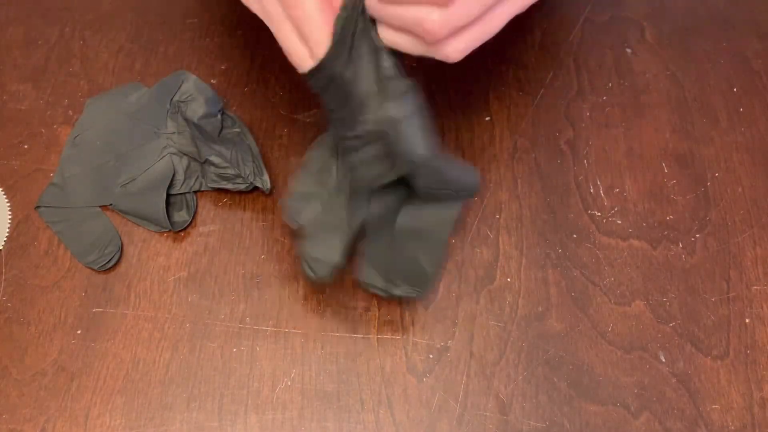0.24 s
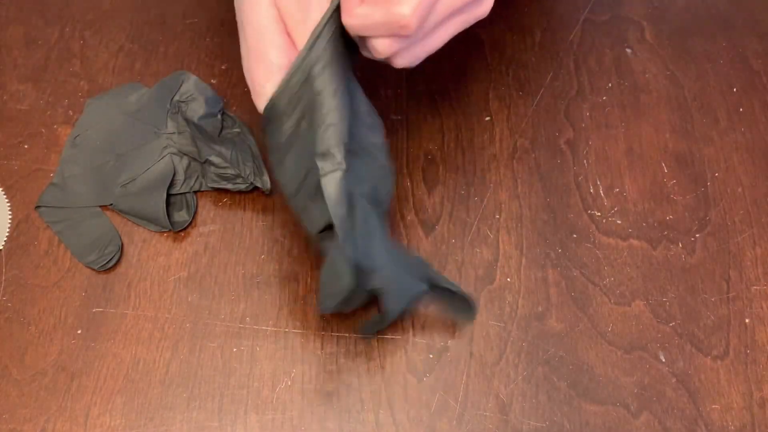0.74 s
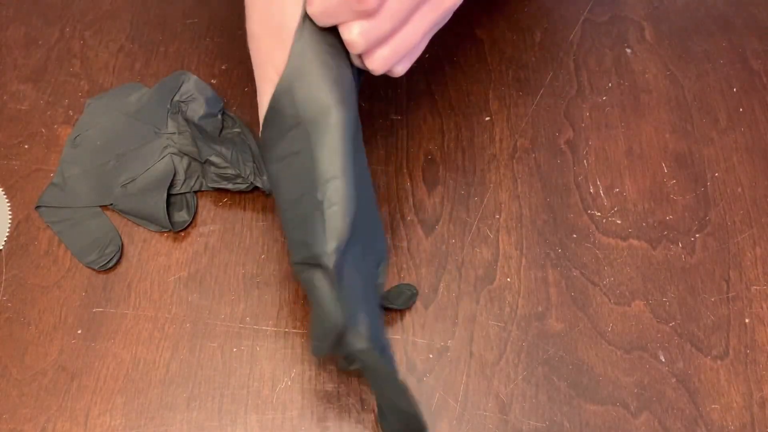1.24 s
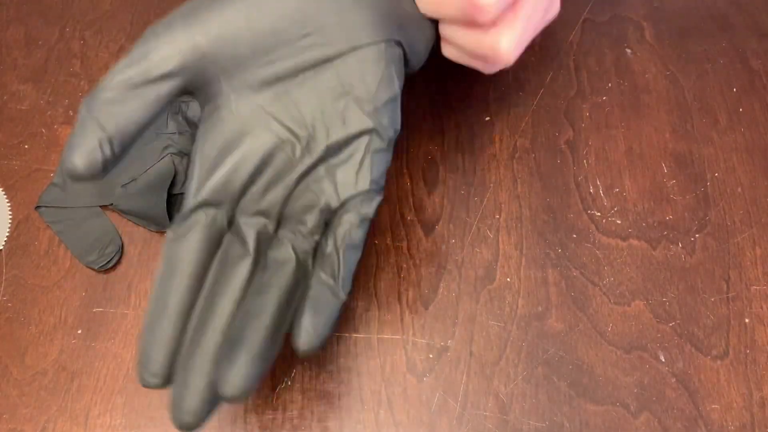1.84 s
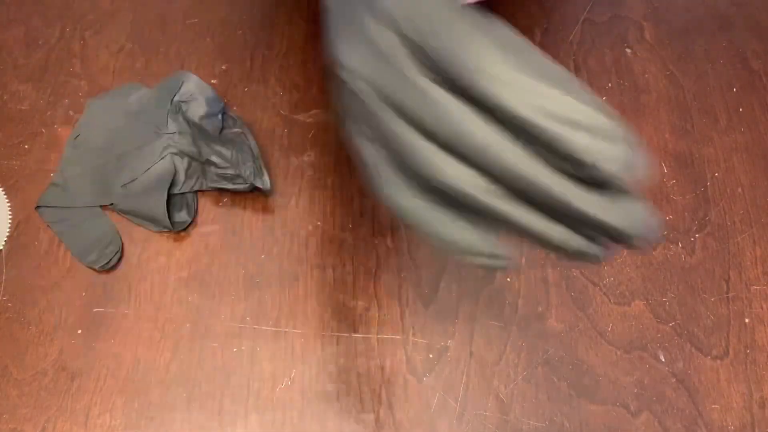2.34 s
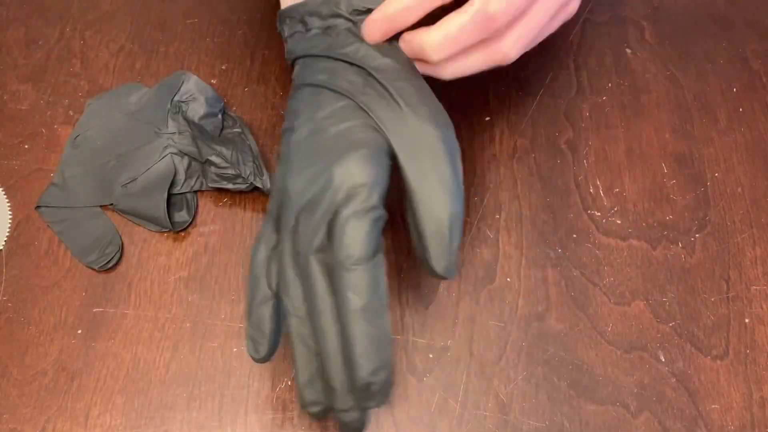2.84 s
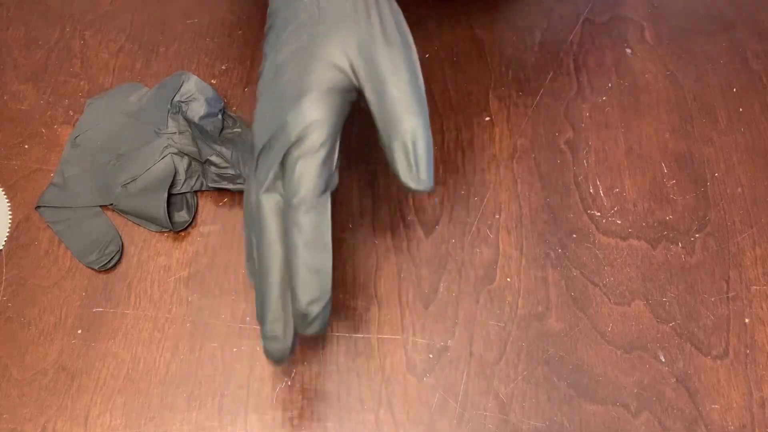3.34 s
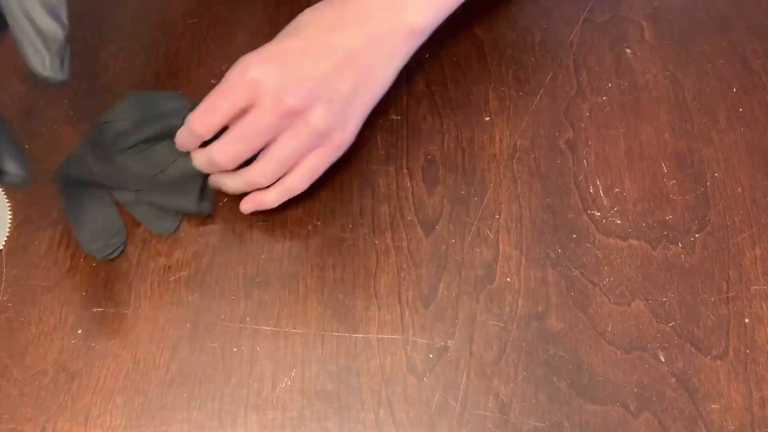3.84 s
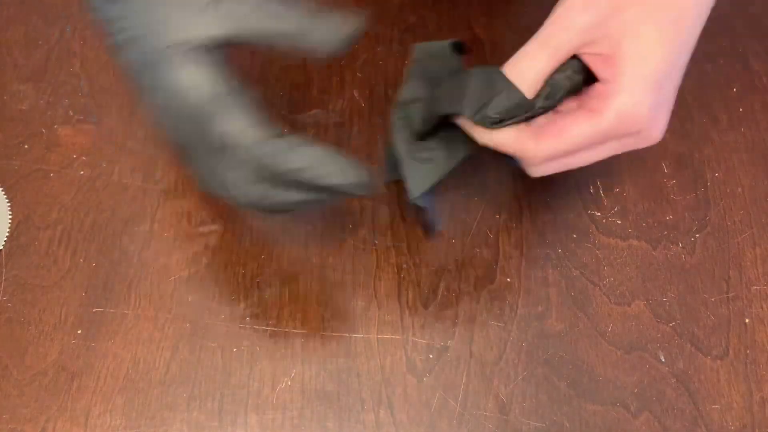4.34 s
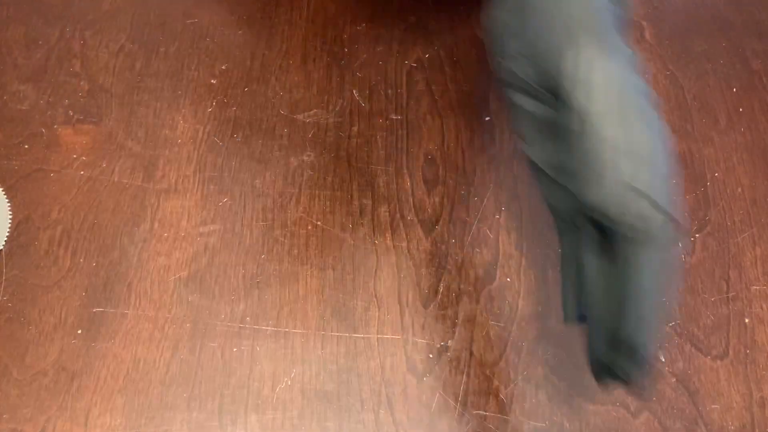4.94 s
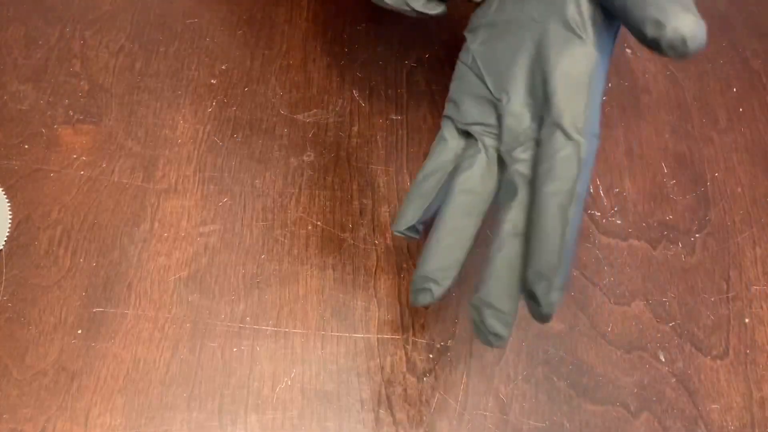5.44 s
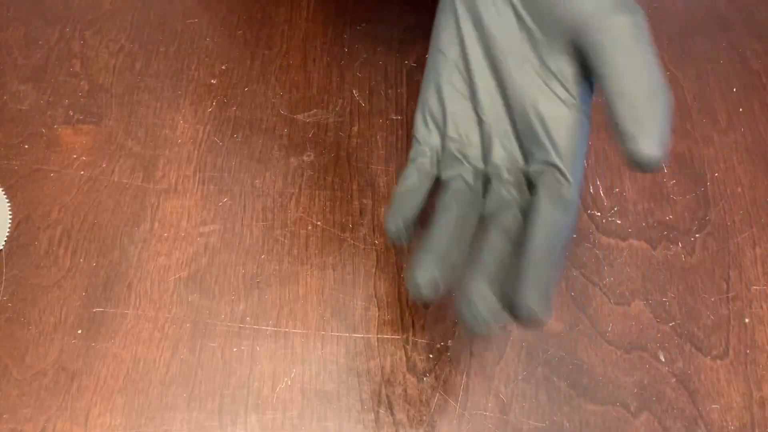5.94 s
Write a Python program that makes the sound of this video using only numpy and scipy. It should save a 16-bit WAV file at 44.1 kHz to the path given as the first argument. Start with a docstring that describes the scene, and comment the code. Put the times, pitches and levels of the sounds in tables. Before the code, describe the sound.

Two thin rubber gloves are pulled on close up, with crackly rustling, squeaky stretching, sharp finger pops and one loud cuff snap in a quiet room.

```python
"""A small quiet room: two thin rubber gloves are pulled on over a wooden table, close to a stereo microphone.
Each pull, and a hand sliding on the table near 3.8 s, is filtered slip noise that hisses and crackles.
Wrinkles and creases tick, dragging rubber rasps; finger pops, cuff snaps and judders are noise cracks, ringing
slaps and trapped air. Short low pushes are decaying sines; quick bounces, a short ringing tail and a low steady
rumble of shaped noise make the room. For about 60 ms near 4.3 s the sound drops out completely."""
import sys
import numpy as np
from scipy import signal
from scipy.fft import rfft, irfft
from scipy.io import wavfile
from scipy.ndimage import uniform_filter1d

SR = 44100
rng = np.random.default_rng(int(sys.argv[2]) if len(sys.argv) > 2 else 0)


def unload_wav(signal):
    """Save mono or channel-first audio to the path in sys.argv[1] as 16-bit WAV at rate SR, clipped to [-1, 1]."""
    wavfile.write(
        sys.argv[1],
        SR,
        np.round(np.clip(np.atleast_2d(signal).T, -1, 1) * 32767).astype(np.int16),
    )


N = 272097  # length in samples

# Bright spectrum of rubber cracking, shared by snaps and creases.
# Each row: frequency in Hz, relative level in dB.
CRACK_SPECTRUM = [(200, -25), (1500, -13), (2800, -7), (4500, -5.5), (6500, -3.5), (8300, -1.5), (9800, .5),
                  (12000, 0), (16000, -2.5)]


def rubbing():
    """Sliding hisses; the folds of the rubber flutter and give a coarser, lower crackle, with wrinkle ticks."""
    # Spectrum of the hiss. Each row: frequency in Hz, relative level in dB.
    hiss_spectrum = [(300, -40), (1500, -18), (2900, -10.5), (4000, -7.5), (5400, -7.5), (7000, -4),
                     (8400, -3), (10000, 0), (12800, -1.2), (15200, 0), (16000, -2)]
    # Spectrum of the flexing sheet. Each row: frequency in Hz, relative level in dB.
    body_spectrum = [(40, -18.5), (140, -1), (260, 0), (480, 2), (800, -6.5), (1300, -6.5), (1700, -13),
                     (2050, -6), (2600, -5.5), (3700, -1.5), (5000, -3), (12000, -22.5)]
    # How loose and wrinkled the sheet is, most of all while the first glove hangs empty.
    # Each row: time in seconds, relative level of the wrinkles in dB.
    looseness_points = [(0, 6), (0.85, 7), (1.4, 2), (2.0, -10), (3.0, -21), (4.4, 1), (4.7, -1),
                        (6.17, -6.5)]

    hiss_level, body_level = effort()
    catch = wander(rate_hz=150)  # the rubber grips and lets go

    hiss_grains = slips(per_s=4600, spread_db=3.5, smooth=0.44)
    hiss = spread(colour(hiss_grains, hiss_spectrum), width=0.0024)
    hiss = hiss * hiss_level * amp(0.94 * catch)

    body_grains = slips(per_s=1200, spread_db=1.0, smooth=0.59)
    body = spread(colour(body_grains, body_spectrum), width=0.54)
    body = body * body_level * amp(2.48 * catch + 3.0)

    # wrinkles stand out where the sheet flexes but hardly slides
    flex_share = np.sqrt(body_level / (body_level + hiss_level))
    looseness = amp(np.interp(np.arange(N) / SR, *np.transpose(looseness_points)))
    ticks = stereo_image(wrinkles(per_s=210, spread_db=9.0, ring_s=0.0005))
    ticks = ticks * body_level * flex_share * looseness * amp(-3.5)
    return folds(hiss, patchy_db=2.5) + folds(body, patchy_db=4.0) + ticks


def effort():
    """Levels of hiss and body: each pull swells to its fastest sliding and fades; overlaps add in power."""
    # Pulls of rubber over skin, and a hand sliding on the table near 3.8 s.
    # Each row: time of fastest sliding in seconds, swell in seconds, fade in seconds,
    # relative hiss level in dB, relative level of the lower body in dB.
    pulls = [(0.03, 0.15, 0.15, -53, -67.5), (0.135, 0.048, 0.018, -47.5, -62.5),
             (0.25, 0.1, 0.11, -48, -63.5), (0.485, 0.072, 0.024, -54.5, -61),
             (0.579, 0.014, 0.014, -53, -53), (0.63, 0.062, 0.058, -50, -60),
             (0.78, 0.003, 0.016, -49, -81), (0.828, 0.051, 0.1, -45.5, -60),
             (1.045, 0.082, 0.053, -53.5, -60), (1.17, 0.016, 0.18, -46.5, -60),
             (1.246, 0.064, 0.062, -38.5, -50.5), (1.44, 0.037, 0.1, -61.5, -60),
             (1.595, 0.08, 0.13, -51.5, -59.5), (1.785, 0.0079, 0.01, -43, -48),
             (1.883, 0.063, 0.051, -53.5, -58.5), (2.04, 0.04, 0.13, -59, -66.5),
             (2.194, 0.061, 0.021, -49.5, -60), (2.355, 0.06, 0.1, -63.5, -75),
             (2.478, 0.018, 0.013, -62, -68), (2.54, 0.013, 0.033, -66, -64.5),
             (2.606, 0.032, 0.039, -50, -79), (2.804, 0.014, 0.027, -66, -81),
             (2.899, 0.024, 0.013, -64, -75), (3.023, 0.03, 0.016, -45.5, -81),
             (3.115, 0.083, 0.019, -62.5, -71), (3.39, 0.042, 0.027, -56, -64.5),
             (3.76, 0.059, 0.1, -58.5, -67.5), (3.862, 0.043, 0.021, -61.5, -68.5),
             (4.035, 0.021, 0.04, -48, -63), (4.211, 0.035, 0.042, -56, -70), (4.5, 0.039, 0.069, -55, -58),
             (4.634, 0.0069, 0.0088, -57, -58.5), (4.672, 0.0071, 0.03, -55.5, -60.5),
             (4.73, 0.036, 0.078, -39, -54), (4.899, 0.065, 0.056, -48.5, -55),
             (5.03, 0.017, 0.026, -52.5, -64), (5.186, 0.0063, 0.018, -58, -65.5),
             (5.275, 0.016, 0.049, -58.5, -70), (5.41, 0.018, 0.1, -58.5, -65.5),
             (5.462, 0.0025, 0.075, -37, -52.5), (5.516, 0.0087, 0.0086, -42, -45),
             (5.695, 0.013, 0.071, -55.5, -63.5), (5.87, 0.022, 0.089, -58.5, -62.5),
             (5.931, 0.013, 0.02, -43, -55), (5.984, 0.012, 0.021, -61, -64.5),
             (6.074, 0.021, 0.053, -48.5, -50)]
    pull_shape = 1.75  # exponent of swell and fade: 1 is a sharp peak, 2 a round bell
    body_follow = 0.75  # the sheet keeps flexing a little before and after it slides
    rest_hiss_db, rest_body_db = -78.5, -81.5  # the hands are never quite still

    t = np.arange(N) / SR
    hiss_power = np.full(N, amp(rest_hiss_db) ** 2)
    body_power = np.full(N, amp(rest_body_db) ** 2)
    for s, swell, fade, hiss_db, body_db in pulls:
        near = (t > s - 5 * swell) & (t < s + 5 * fade)
        distance = np.maximum((s - t[near]) / swell, (t[near] - s) / fade)
        speed = np.exp(-distance ** pull_shape)
        hiss_power[near] += (amp(hiss_db) * speed) ** 2
        body_power[near] += (amp(body_db) * speed ** body_follow) ** 2
    return np.sqrt(hiss_power), np.sqrt(body_power)


def slips(per_s, spread_db, smooth):
    """Tiny stick-slip releases of uneven size over the smooth noise of sliding."""
    sizes = amp(spread_db * np.minimum(rng.exponential(1, (3, N)), 4))
    happens = rng.random((3, N)) < per_s / SR
    clicks = sizes * rng.choice([-1, 1], (3, N)) * happens
    return unit(unit(clicks) + smooth * rng.standard_normal((3, N)))


def wrinkles(per_s, spread_db, ring_s):
    """Single wrinkles flip over with a dry tick, each at one of six pitches."""
    t, out = np.arange(256) / SR, np.zeros(N)
    pitches_hz = [1300, 1550, 1750, 1900, 2000, 2100]
    for hz in pitches_hz:
        happens = rng.random(N) < per_s / len(pitches_hz) / SR
        flips = happens * amp(spread_db * rng.uniform(-0.26, 1, N))
        tick = np.sin(2 * np.pi * hz * t) * t * np.exp(-t / ring_s)
        out += signal.oaconvolve(flips, tick)[:N]
    return unit(out)


def folds(x, patchy_db):
    """Folds open and close and recolour the rustle in patches; closing muffles more than opening adds."""
    z = signal.stft(x, SR, nperseg=512)[2]
    patches = rng.standard_normal(z.shape[1:])
    patches = uniform_filter1d(patches, size=6, axis=0)  # across frequency
    patches = unit(uniform_filter1d(patches, size=5, axis=1))  # across time
    patches = np.minimum(patches, .8)
    return signal.istft(z * unit(amp(patchy_db * patches)), SR, nperseg=512)[1][:, :N]


def chafing():
    """Where rubber drags on rubber, quick slips ring the sheet or the air under it in a grainy rasp."""
    # Rubber chafing on rubber, high where it is taut and hollow over a pocket of air.
    # Each row: time of the middle in seconds, level in dB, pitch in Hz, length to 1/e either side in seconds.
    chafes = [(0.812, -56, 487, 0.046), (0.867, -61.5, 1640, 0.16), (1.235, -48.5, 1860, 0.03),
              (1.598, -59, 3760, 0.0088), (1.66, -58, 555, 0.045), (1.827, -69, 493, 0.039),
              (2.124, -65.5, 1190, 0.063), (2.58, -65, 413, 0.05), (2.62, -56, 10400, 0.019),
              (3.024, -61, 1050, 0.013), (3.957, -66.5, 3800, 0.0092), (4.556, -62.5, 514, 0.045),
              (4.735, -53, 2580, 0.046), (4.961, -54.5, 3630, 0.014), (6.095, -41.5, 3350, 0.024)]
    t, out = np.arange(-8192, 8192) / SR, np.zeros((3, N))
    grains = slips(per_s=1100, spread_db=1.5, smooth=1.0)
    for s, db, hz, length in chafes:
        drive = np.roll(grains, -round(s * SR), axis=1)[:, :len(t)]
        swell = np.exp(-(t / length) ** 2)
        for channel in range(3):
            rasp = band_pass(drive[channel], hz, ratio=1.25)
            add(out[channel], s + t[0], amp(db) * rasp * swell)
    return spread(out, width=0.99)


def creases():
    """A crease buckles all at once: a bright edge and a tick that is gone within a few cycles."""
    # Creases that flip over with a dry click.
    # Each row: start in seconds, tick level in dB, tick pitch in Hz, level of the bright edge in dB.
    flips = [(0.549, -45, 1400, -53), (0.559, -48, 1500, -53), (1.111, -42, 2020, -60),
             (1.3855, -42, 2060, -64), (1.442, -44, 1950, -35.5), (1.63, -49, 1400, -60),
             (1.659, -48, 1300, -58), (1.859, -50, 1100, -63), (1.867, -47, 1100, -42),
             (1.8796, -37.5, 1050, -36), (1.892, -37, 2400, -55), (1.908, -46, 1900, -39),
             (1.9245, -41.5, 1670, -46), (2.515, -51, 2340, -64), (2.526, -40, 3100, -67),
             (2.534, -56, 1280, -53), (2.542, -57, 1090, -61), (3.952, -49, 4000, -67),
             (4.426, -43.5, 2500, -54), (4.4284, -47, 1970, -51), (4.4743, -42.5, 1900, -47.5),
             (4.5005, -46, 1900, -45), (4.504, -44, 2300, -52), (4.533, -49, 1300, -49),
             (4.561, -42, 1380, -46), (4.5935, -47, 1900, -52), (4.599, -48, 1740, -46.5),
             (5.1814, -44, 2900, -48), (5.191, -55, 3000, -57), (5.305, -62.5, 3050, -42),
             (6.093, -28, 3370, -33), (6.1118, -38, 3400, -27.5)]
    t = np.arange(512) / SR
    edges, ticks = np.zeros(N), np.zeros(N)
    for s, tick_db, hz, edge_db in flips:
        add(edges, s, amp(edge_db) * rng.standard_normal(len(t)) * np.exp(-t / 0.0007))
        add(ticks, s, amp(tick_db) * np.sin(2 * np.pi * hz * t) * np.exp(-t / 0.001))
    return stereo_image(colour(edges, CRACK_SPECTRUM) + ticks)


def snaps():
    """The sheet whips down with a crack and a slap, and the air trapped under it rings."""
    # Finger pops and cuff snaps. Each row: contact in seconds, relative crack level in dB, slap level in dB,
    # slap pitch in Hz, relative air pocket level in dB, slap decay in seconds, and the share of the slap
    # that is one clean blow from 0 to 1 (the rest is the sheet fluttering).
    pops = [(0.5655, -55, -48, 960, -41, 0.0024, 0), (0.5728, -41.5, -35.5, 2430, -47, 0.0014, 0.3),
            (0.5738, -51, -36.5, 1150, -37.5, 0.0008, 0.5), (0.5873, -56, -44, 1240, -50, 0.00064, 0.7),
            (0.6026, -58, -42, 1190, -61, 0.0015, 0.9), (0.6169, -55, -39, 1300, -54, 0.0012, 0.7),
            (0.6269, -48, -36, 1280, -42.5, 0.0024, 0.3), (0.6405, -52, -45, 1200, -50, 0.0013, 0.9),
            (1.6378, -70, -49, 790, -36.5, 0.0021, 0.8), (1.648, -72, -54, 1100, -41.5, 0.0014, 0.4),
            (1.6895, -66, -51, 810, -41, 0.0013, 0.7), (1.7443, -50, -45, 1400, -52, 0.0013, 0.4),
            (1.7487, -48, -39, 1120, -37.5, 0.0016, 0.7), (1.753, -39, -37.5, 990, -39.5, .0011, 0.9),
            (1.7811, -36.5, -38.5, 1300, -26, 0.0012, .6), (3.0322, -53, -56.5, 980, -54, 0.0073, 0.06),
            (3.3442, -35, -38.5, 950, -38.5, 0.002, 0.83), (4.8335, -30, -28.5, 1860, -38, 0.0073, 0),
            (4.8368, -15.5, -22, 1500, -25, 0.0015, 0.3), (4.851, -44.5, -37, 1880, -34.5, 0.0027, 0.07),
            (5.5215, -38, -28.5, 1230, -31.5, 0.0031, 0.4), (5.694, -36, -34.5, 1890, -56, 0.0079, 0),
            (5.9338, -36.5, -49, 1143, -48.5, 0.002, 0.03), (6.0632, -37, -43, 910, -39, 0.0064, 0.2),
            (6.078, -34, -40, 980, -42, 0.0024, 0.04), (6.0835, -33, -41, 1400, -38, 0.0011, 0.7),
            (6.1095, -42, -44, 1010, -39, 0.0028, .3)]
    t = np.arange(-512, 1536) / SR
    cracks, bodies = np.zeros((3, N)), np.zeros(N)
    for s, crack_db, slap_db, slap_hz, pocket_db, decay, blow_share in list(pops) + judders():
        crack = rng.standard_normal((3, len(t))) * burst(t, rise_s=.0008, fall_s=.0028)
        crack[0] += 5.6 * (t == 0)  # the instant of contact
        for channel in range(3):
            add(cracks[channel], s + t[0], amp(crack_db + 2.5) * crack[channel])
        blow = amp(slap_db) * slap(t, slap_hz, decay, blow_share)
        air = amp(pocket_db + 1.0) * pocket(t)
        add(bodies, s + t[0], blow + air)
    left_right = amp([[1.1], [-1.1]])  # the left is a little louder
    return spread(colour(cracks, CRACK_SPECTRUM), width=0.36) + stereo_image(bodies) * left_right


def judders():
    """Taut rubber jumps along the skin in a run of small snaps, nearly even in time, uneven in strength."""
    # Each row: first snap in seconds, count of snaps, spacing in seconds, relative crack level in dB,
    # slap level in dB, slap pitch in Hz, relative air pocket level in dB, growth in dB per snap.
    runs = [(4.551, 5, 0.01, -66.5, -54, 1205, -57, 0), (4.705, 2, 0.0095, -57, -45, 1077, -54, -2.5),
            (5.462, 2, 0.018, -37.5, -38, 1140, -47, 0), (5.5027, 7, .0029, -50, -41, 1140, -67, 1.45),
            (5.693, 3, .0012, -47, -39.5, 1620, -54.5, 0)]
    jitter_s, spread_db, decay_s = .0001, 2.5, 0.0011
    blow_share = 0.45  # share of each slap that is one clean blow
    rows = []
    for start, count, spacing, crack_db, slap_db, slap_hz, pocket_db, growth_db in runs:
        for k, (late, strong) in enumerate(rng.standard_normal((round(count), 2))):
            s = start + k * spacing + jitter_s * late
            db = k * growth_db + spread_db * strong
            rows.append((s, crack_db + db, slap_db + db, slap_hz, pocket_db + db, decay_s, blow_share))
    return rows


def slap(t, hz, decay, blow_share):
    """One clean blow of rubber on skin, with a short flutter around it."""
    shape = burst(t, rise_s=0.00088, fall_s=decay)
    share = np.clip(blow_share, 0, 1)
    blow = band_pass(1. * (t == 0), hz, ratio=1.34)
    flutter = unit(band_pass(rng.standard_normal(len(t)), hz, ratio=1.91) * shape)
    mixed = np.sqrt(share) * blow + np.sqrt(1 - share) * flutter
    return mixed * np.sqrt(np.mean(shape ** 2))


def pocket(t):
    """Trapped air rings briefly, each pocket at its own pitch, which falls as the rubber slackens."""
    slack_hz = 491.7 * (1 + 0.033 * rng.standard_normal())
    hz = slack_hz * (1 + 0.321 * burst(t, rise_s=0.016, fall_s=0.00063))
    cycles = np.cumsum(hz) / SR + rng.random()
    # loudest 2 ms after contact
    return np.sin(2 * np.pi * cycles) * burst(t - .002, rise_s=0.0009, fall_s=0.0018)


def low_pushes():
    """Short low pushes: the hand's flesh under a blow, or air pressed out of the glove."""
    # Each row: time in seconds, relative level in dB, pitch in Hz.
    pushes = [(1.047, -54, 193), (1.264, -47.5, 160), (1.291, -50, 144), (1.7823, -49.5, 290),
              (4.838, -41, 310), (4.841, -42, 181), (4.845, -42.5, 97), (5.479, -51.5, 94),
              (5.942, -46, 176), (6.104, -53, 154)]
    t, out = np.arange(-1024, 3072) / SR, np.zeros(N)
    for s, db, hz in pushes:
        push = np.sin(2 * np.pi * hz * t) * burst(t, rise_s=0.0014, fall_s=0.0072)
        add(out, s + t[0], amp(db + 6.5) * push)
    return stereo_image(out)


def bounces(x):
    """Hard surfaces close by return a few quick copies, each from the opposite side."""
    # Early bounces off the table and walls. Each row: delay in seconds, level in dB.
    echoes = [(.0083, -14), (0.014, -25.5)]
    out = np.zeros((2, N))
    for s, db in echoes:
        for channel in range(2):
            add(out[channel], s, amp(db) * x[1 - channel])
    return out


def room(x):
    """A diffuse tail that dies band by band, and a few resonances."""
    # The room's decay. Each row: frequency in Hz, time to fall 60 dB in seconds.
    decay_times = [(150, .35), (500, .28), (1400, .32), (3700, .36), (10000, .35), (15000, .29)]
    # Strength of the tail. Each row: frequency in Hz, relative level in dB.
    tail_levels = [(100, 0.5), (250, -19), (380, -10), (540, -3), (800, -5.5), (1100, -6.5), (1600, -8),
                   (2700, -7), (4500, -8.5), (11000, -20), (15000, -18)]
    # Resonances of the table and room.
    # Each row: frequency in Hz, relative level in dB, time to fall 60 dB in seconds.
    modes = [(147, -66, .3), (357, -55, .22), (490, -51, .2), (580, -52, .08), (690, -58, .06),
             (1015, -52, .22), (1238, -56, .22), (1394, -53, .2), (1548, -52, .2), (1718, -56, .2),
             (1935, -55, .2)]

    size = 2 ** 15
    t = np.arange(size) / SR
    hz, at, z = signal.stft(rng.standard_normal((2, size)), SR, nperseg=256)
    t60 = read(decay_times, hz)[:, None]
    z *= amp(read(tail_levels, hz))[:, None] * np.exp(-np.log(1000) * at / t60)
    z *= np.sqrt(2 * np.log(1000) / t60 / SR)  # equal energy whatever the decay
    tail = signal.istft(z, SR, nperseg=256)[1][:, :size]
    tail = tail * np.clip(t / .014, 0, 1)  # builds up over 14 ms

    ring = np.zeros(size)
    for f, db, decay in modes:
        ring += amp(db) * np.cos(2 * np.pi * f * t) * np.exp(-np.log(1000) * t / decay)
    return signal.fftconvolve(x, tail + amp(-4.5) * ring, axes=1)[:, :N]


def background():
    """The low, steady rumble of a quiet room, as shaped noise."""
    # Spectrum of the rumble. Each row: frequency in Hz, relative level in dB.
    rumble_spectrum = [(15, -49), (28, -6), (45, 3.5), (70, 6), (120, -3), (200, -5), (280, -11.5),
                       (400, -6.5), (600, -18), (900, -22.5), (1800, -38.5), (4000, -27.5), (15000, -57)]
    rumble_db = -69.5
    noise = rng.standard_normal((3, N))
    return amp(rumble_db) * spread(colour(noise, rumble_spectrum), width=0.25)


def stereo_image(x):
    """Stereo image: the right channel repeats the left with a phase shift that varies with frequency."""
    # Phase by which the left channel leads the right. Each row: frequency in Hz, phase in radians.
    phase_lead = [(0, 0), (1300, .25), (2000, 1.2), (2800, 2.7), (3300, 2.8), (4400, 2.1), (5600, 2.4),
                  (6300, 1.2), (7000, -.6), (7800, -2.8), (8900, -3.4), (10500, -6), (11500, -6.4),
                  (12800, -9.1), (13900, -9.7), (15400, -12.5)]
    lag = np.interp(np.fft.rfftfreq(N, 1 / SR), *np.transpose(phase_lead))
    return np.array([x, irfft(rfft(x) * np.exp(-1j * lag), N)])


def spread(sounds, width):
    """A wide source: one part common to both channels and one for each alone."""
    width = np.clip(width, 0, 1)
    return np.sqrt(1 - width) * stereo_image(sounds[0]) + np.sqrt(width) * sounds[1:]


def burst(t, rise_s, fall_s):
    """An envelope that swells to 1 at t = 0 and dies away."""
    return np.exp(np.minimum(t / rise_s, -t / fall_s))


def band_pass(x, hz, ratio):
    """A resonance that spans a frequency ratio either side of hz; rms 1."""
    ratio = max(ratio, 1.02)
    edges_hz = [hz / ratio, min(hz * ratio, SR / 2 - 1)]
    band = signal.butter(2, edges_hz, "band", fs=SR, output="sos")
    return unit(signal.sosfilt(band, x))


def colour(x, spectrum):
    """Filters by a spectrum, keeping the power of white noise."""
    gain = amp(read(spectrum, np.fft.rfftfreq(x.shape[-1], 1 / SR)))
    return irfft(rfft(x) * unit(gain), x.shape[-1])


def wander(rate_hz):
    """A random level of rms 1 that runs in straight lines between rate_hz points a second."""
    knots = np.arange(N) * rate_hz / SR
    return unit(np.interp(knots, np.arange(N), rng.standard_normal(N)))


def amp(db):
    """Decibels to gain."""
    return 10 ** (np.asarray(db) / 20)


def unit(x):
    """Scales to rms 1."""
    return x / np.sqrt(np.mean(x ** 2) + 1e-20)


def read(points, hz):
    """Reads a table on a log-frequency axis."""
    f, value = np.transpose(points)
    return np.interp(np.log(hz + 1), np.log(f + 1), value)


def add(mix, s, sound):
    """Lays a sound into the mix at time s."""
    part = mix[max(round(s * SR), 0):][:len(sound)]
    part += sound[:len(part)]


def scene():
    """Both gloves, the room and its rumble."""
    gloves = rubbing() + chafing() + creases() + snaps() + low_pushes()
    return gloves + bounces(gloves) + room(gloves) + background()


def record(dry):
    """The microphone loses the deepest bass; the sound drops out briefly; then the treble is band-limited."""
    high_pass = signal.butter(2, 32, "high", fs=SR, output="sos")
    thin = signal.sosfilt(high_pass, dry)
    gap = np.interp(np.arange(N) / SR, [4.298, 4.304, 4.36, 4.368], [1, 0, 0, 1])
    edge_hz = 15900
    low_pass = signal.firwin(255, edge_hz, window=("kaiser", 8), fs=SR)
    return signal.oaconvolve(thin * gap, low_pass[None], "same")


dry = scene()
out = record(dry)
unload_wav(out)
```